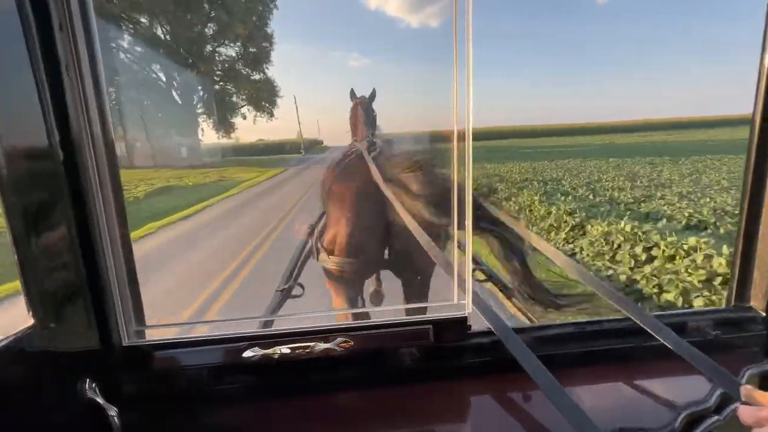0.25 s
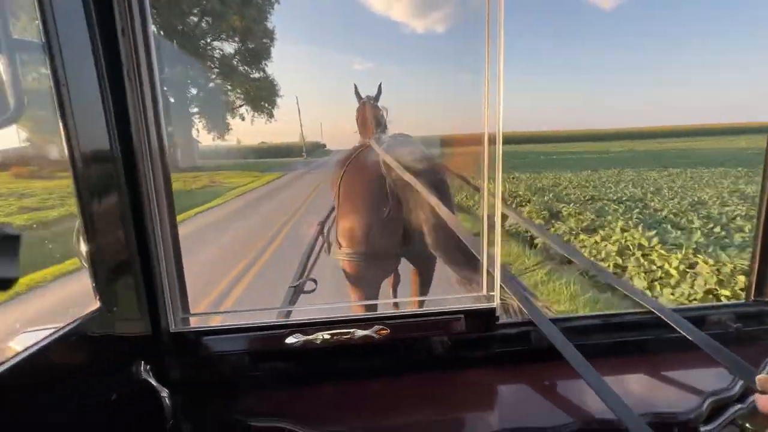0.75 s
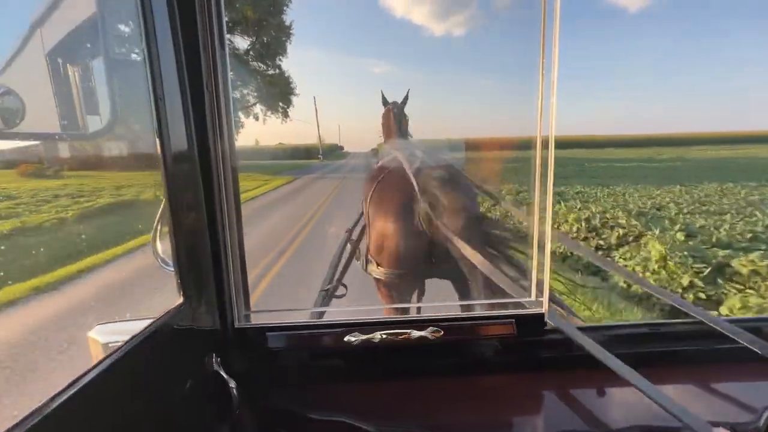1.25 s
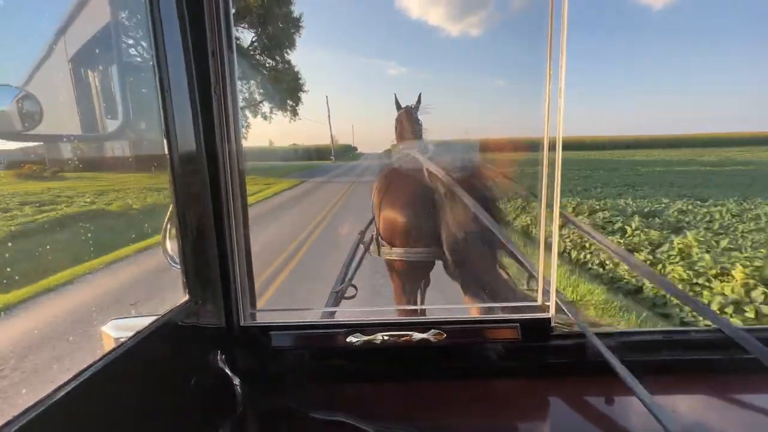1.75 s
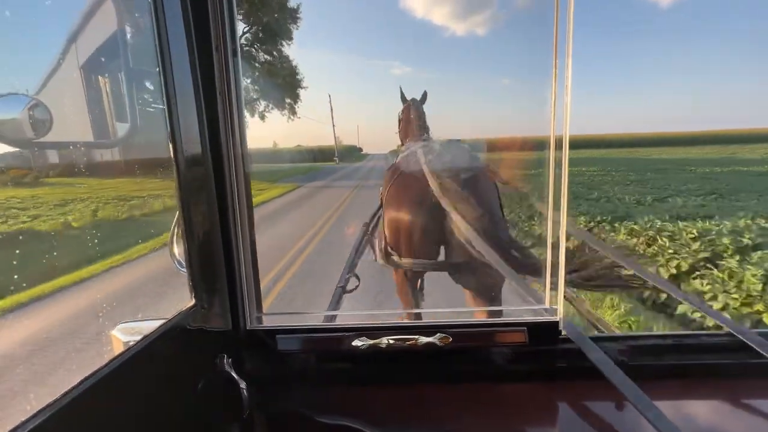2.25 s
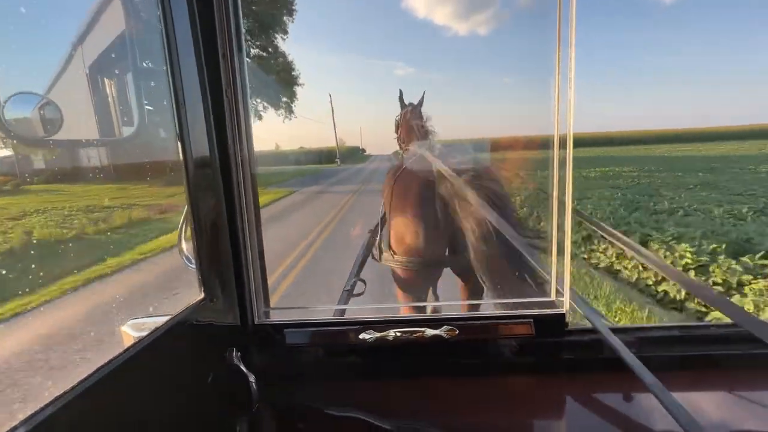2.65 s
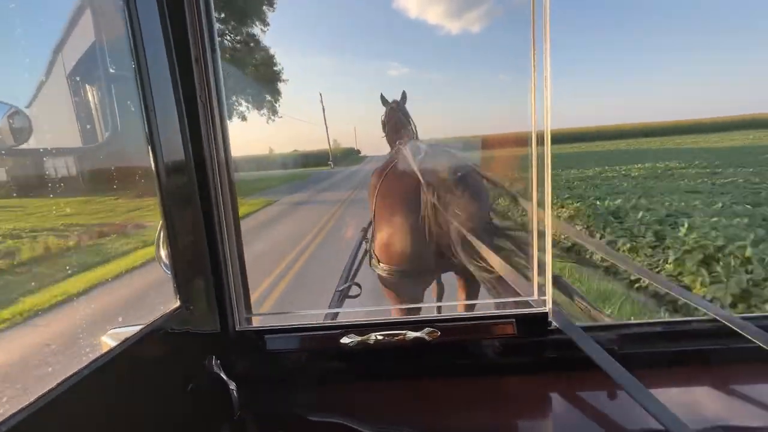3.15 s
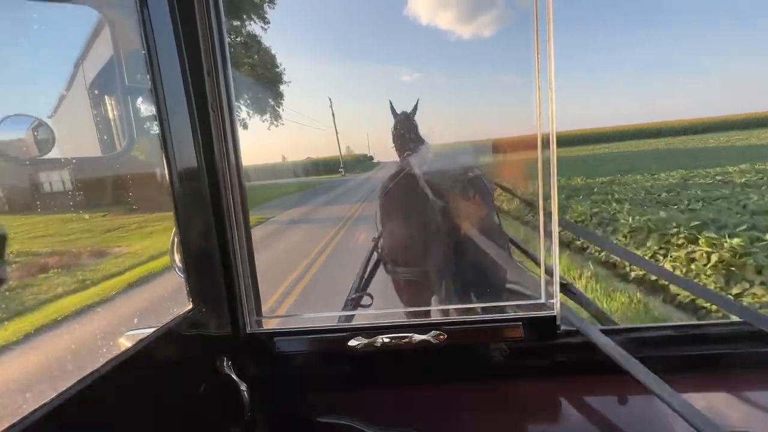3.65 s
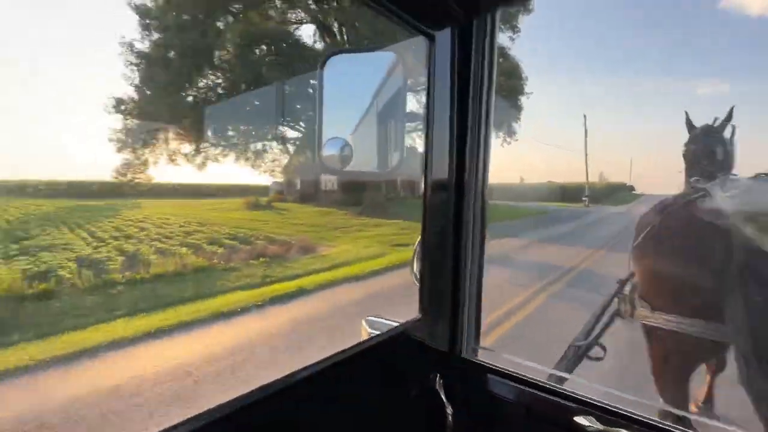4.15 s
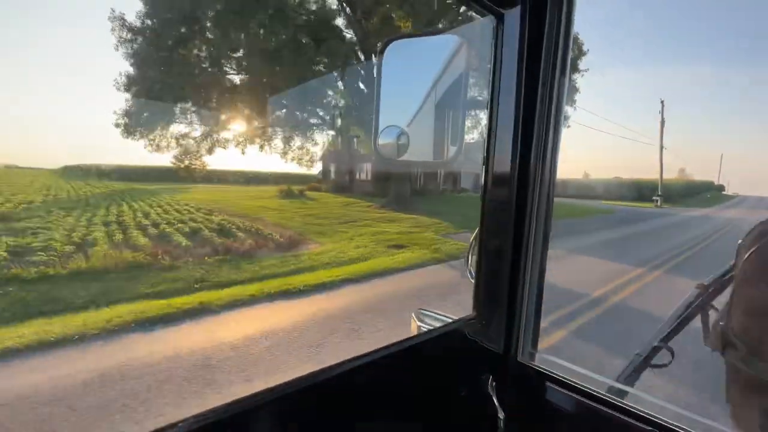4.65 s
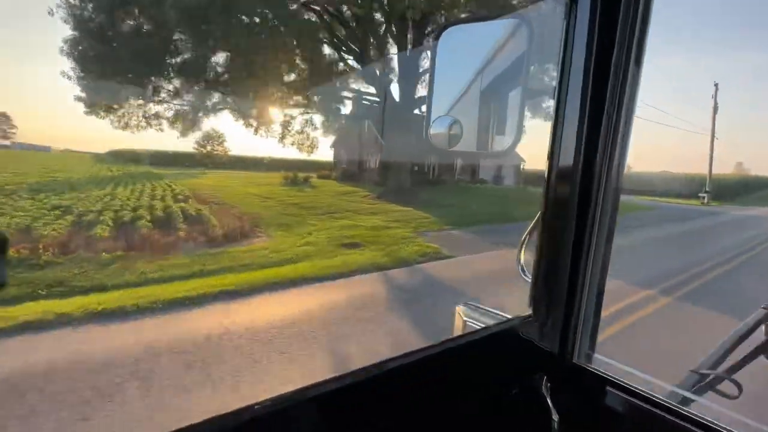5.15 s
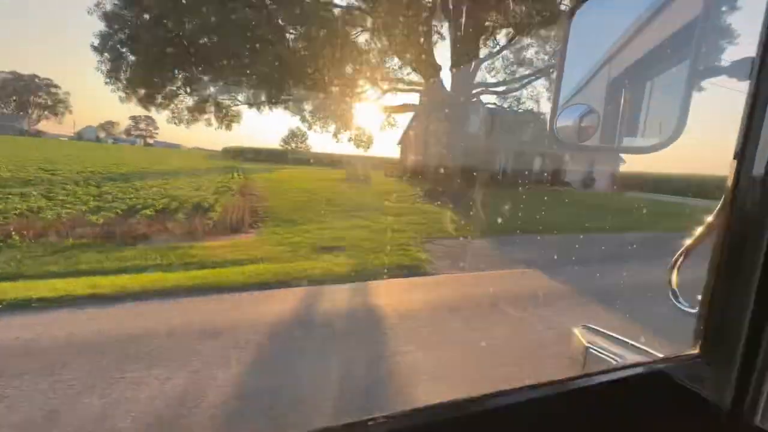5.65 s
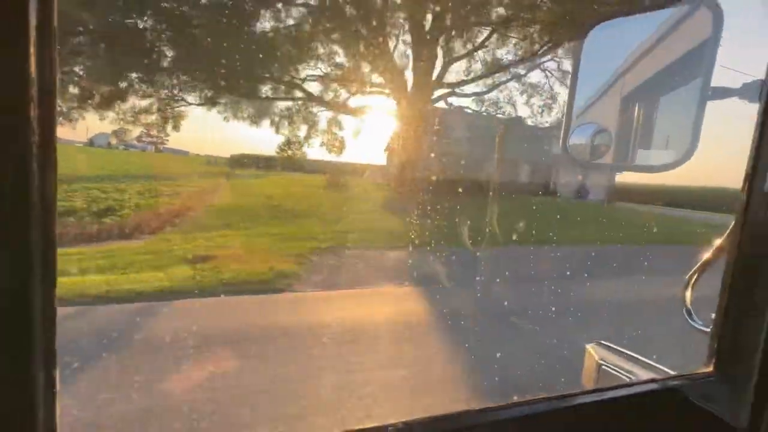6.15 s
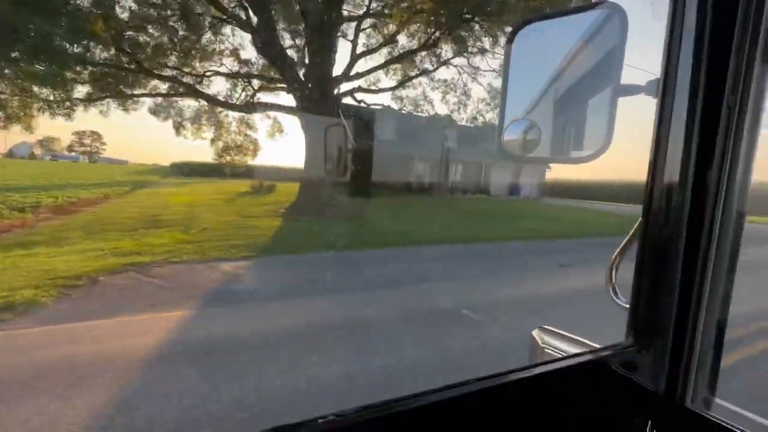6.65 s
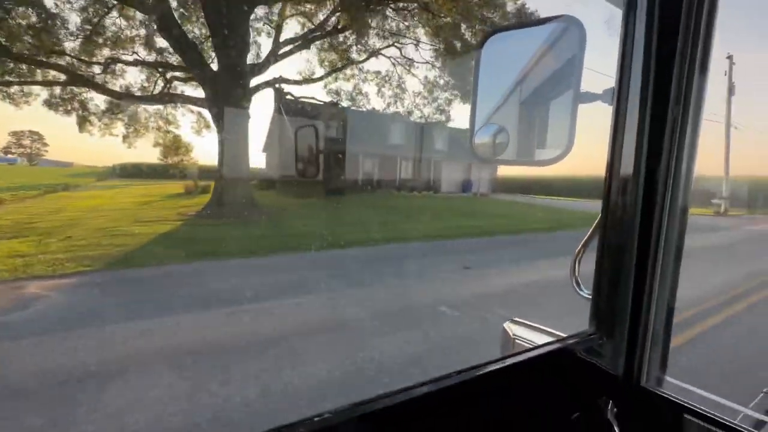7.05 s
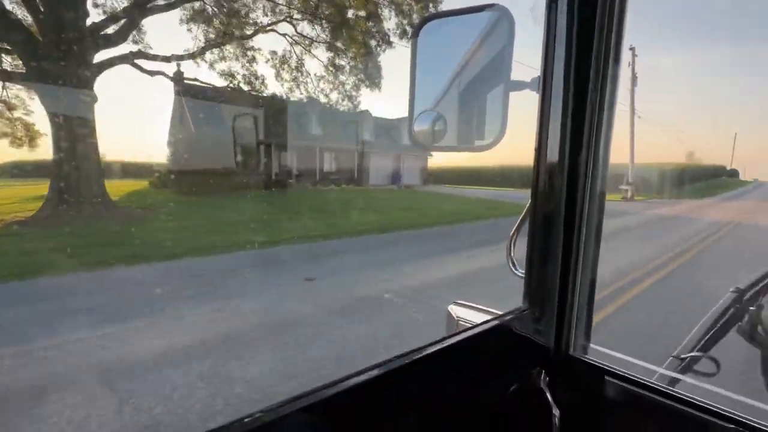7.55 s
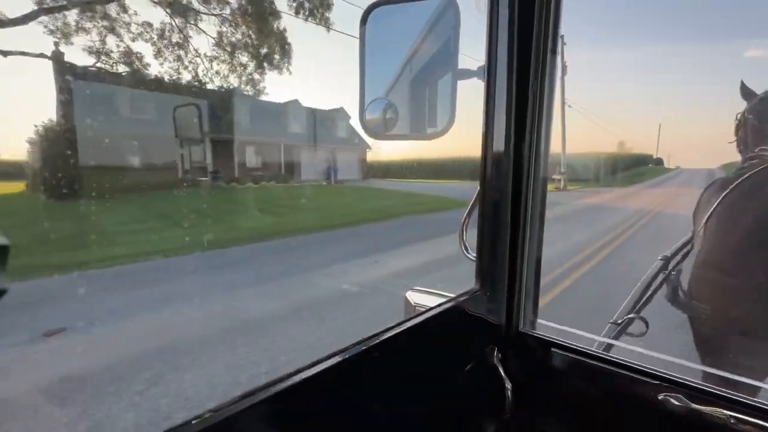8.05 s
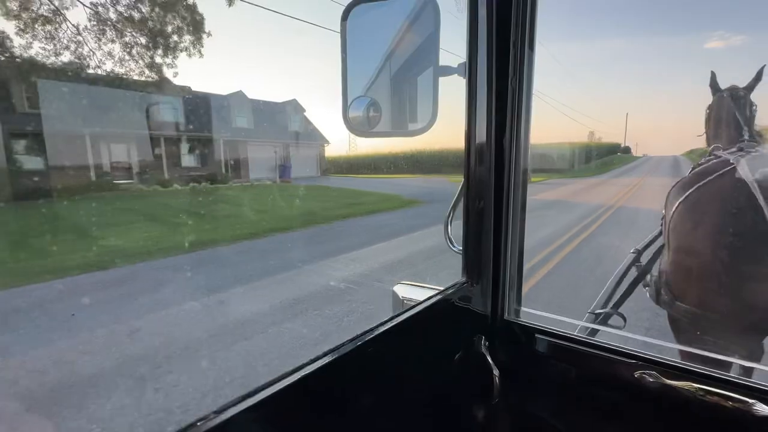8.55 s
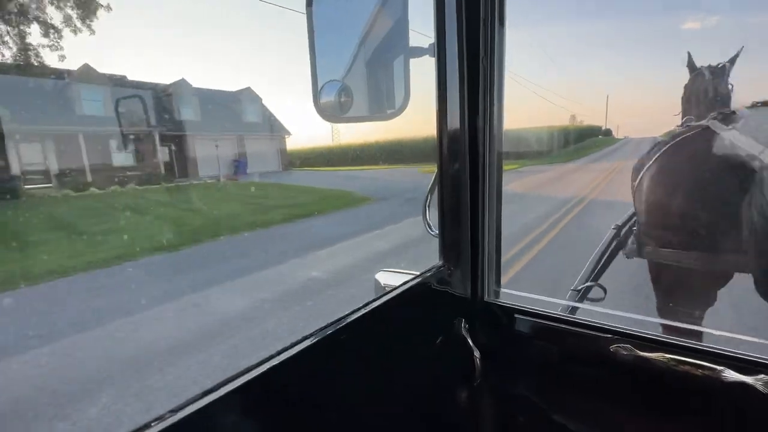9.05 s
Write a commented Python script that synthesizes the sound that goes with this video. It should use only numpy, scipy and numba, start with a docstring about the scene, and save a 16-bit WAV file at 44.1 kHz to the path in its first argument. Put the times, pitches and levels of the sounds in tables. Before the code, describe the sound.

A horse trots steadily on asphalt, hollow paired clops ringing over the low rumble, drumming panels and loose rattles of a closed buggy.

```python
"""Inside the cabin of a closed buggy on asphalt, a phone hears a horse trot ahead.
Hooves land in pairs: a noisy grate of the shoe, then a hollow ring of a few decaying modes.
Wheels shake the cabin: noise through resonances makes panels boom and drum, under two wavering hums.
Loose fittings rattle about thirty times a second as noise clacks with a short metal ring.
Harness chinks and ticks of grit stand out over the banded noise of tyres and road."""
import sys
import numpy as np
from scipy import signal
from scipy.fft import rfft, irfft, next_fast_len
from scipy.io import wavfile
from scipy.ndimage import uniform_filter1d
from numba import njit

SR = 44100
rng = np.random.default_rng(int(sys.argv[2]) if len(sys.argv) > 2 else 0)


def materialize(psi):
    """Save the field psi as 16-bit PCM at rate SR to the path in sys.argv[1].

    A 1-D psi becomes a single channel; in a 2-D psi each row is a channel.
    """
    bounded = np.clip(np.atleast_2d(psi).T, -1, 1)
    quanta = np.round(bounded * 32767).astype(np.int16)
    wavfile.write(sys.argv[1], SR, quanta)


N = 410571

# trot steps, a diagonal pair of hooves each:
# [first hoof t/s, wait for the second t/s, first peak level/dB, second peak level/dB]
STEPS = [(0.217, 0.029, -14, -12), (.534, 0.026, -17, -22.5), (.830, 0.024, -16, -15),
         (1.149, 0.033, -22.5, -20), (1.444, 0.034, -15.5, -14), (1.763, 0.036, -20, -18.5),
         (2.058, 0.032, -18, -13.5), (2.375, 0.033, -21.5, -19.5), (2.676, 0.027, -16, -14),
         (2.983, 0.04, -19, -20), (3.280, 0.032, -14.5, -11), (3.590, 0.049, -19, -22),
         (3.883, 0.036, -18, -13.5), (4.202, 0.04, -16.5, -19.5), (4.498, 0.039, -18.5, -11.5),
         (4.809, 0.038, -19.5, -17.5), (5.107, 0.033, -22, -13), (5.416, 0.041, -21.5, -16.5),
         (5.708, 0.034, -18.5, -10.5), (6.025, 0.036, -21.5, -13.5), (6.324, .030, -18, -13),
         (6.643, 0.027, -22.5, -16), (6.931, 0.028, -17, -10.5), (7.246, 0.031, -21, -18),
         (7.537, 0.027, -18, -12.5), (7.852, 0.028, -20, -17), (8.146, 0.029, -17.5, -10),
         (8.470, 0.026, -22, -18.5), (8.779, .018, -15.5, -12.5), (9.098, 0.026, -22, -23.5)]
SHAKE_HZ = 30.55  # swings of the shaking cabin a second
PORT_LAG = 19  # samples by which the left port hears later
T = np.arange(3300) / SR  # time within a short blow, s


def undb(db):
    """Gain of a dB value."""
    return 10 ** (np.asarray(db) / 20)


def level(x, db):
    """Scale to an rms level."""
    return x * undb(db) / np.sqrt(np.mean(x ** 2))


@njit
def svf(x, hz, width):
    """State-variable band-pass: a damped resonance with gain 1 at the centre."""
    y, band, low = np.empty(len(x)), 0., 0.
    g, damping = np.tan(np.pi * hz / SR), width / hz
    for i in range(len(x)):
        v = (band + g * (x[i] - low)) / (1 + g * (g + damping))
        band, low, y[i] = 2 * v - band, low + 2 * g * v, damping * v
    return y


def noise(hz, width_hz, channels=3):
    """Unrelated streams of noise through two equal resonances, for steep skirts; rms 1."""
    def band(x):
        # two passes narrow the band, so each one is wider
        return svf(x, 1. * hz, 1.84 * width_hz)

    streams = rng.standard_normal((channels, N))
    return level(np.array([band(band(x)) for x in streams]), 0)


def walk(rate):
    """Random levels, rate a second, held and slewed twice; spread near 1."""
    k = int(SR / rate)
    steps = np.repeat(rng.standard_normal(N // k + 1), k)
    return 1.83 * uniform_filter1d(uniform_filter1d(steps, k), k)[:N]


def curve(table):
    """Columns of a table of (s, values) at every sample."""
    s, *columns = np.transpose(table)
    return [np.interp(np.arange(N) / SR, s, c) for c in columns]


def train(s, db):
    """One impulse at each time."""
    return np.bincount(np.clip(s * SR, 0, N - 1).astype(int), undb(db), N)


def tail(blows, t60, rise_s):
    """Envelope of a train of blows: short rise, exponential fall."""
    for pole in (np.exp(-np.log(1000) / (t60 * SR)), np.exp(-1 / (rise_s * SR))):
        blows = signal.lfilter([1], [1, -pole], blows)
    return blows / (rise_s * SR)


def fade(t60, rise_s):
    """Envelope of one blow: short rise, exponential fall."""
    return (1 - np.exp(-T / rise_s)) * np.exp(-np.log(1000) * T / t60)


def ring(modes, scatter_db, detune, rise_s):
    """One blow on a set of modes, each with chance strength, pitch and phase; peak 1."""
    hz, db, t60 = np.transpose(modes)[:, :, None]
    size, tune, turn = rng.standard_normal((3, len(modes), 1))
    phase = 2 * np.pi * hz * (1 + detune * tune) * T + 3 * turn
    x = (undb(db + scatter_db * size) * fade(t60, rise_s) * np.sin(phase)).sum(0)
    return x / np.abs(x).max()


def ports(direct, left, right, like):
    """Direct sound reaches the left port late; each port adds its own cabin reflections."""
    like = np.clip(like, 0, 1)
    late = np.concatenate([np.zeros(PORT_LAG), direct[:-PORT_LAG]])
    shared = np.array([late, direct])
    separate = np.array([left, right])
    return np.sqrt(like) * shared + np.sqrt(1 - like) * separate


def add(out, s, sound):
    """Mix a short stereo sound in at time s."""
    i = max(int(s * SR), 0)
    out[:, i:i + sound.shape[1]] += sound[:, :N - i]


def footfalls():
    """Time and level of every hoof: rows first, second."""
    s, gap, *db = np.transpose(STEPS)
    return np.array([s, s + gap]), np.array(db)


def road(grit_db):
    """Half-octave bands of rolling noise; the upper ones follow the grit, crackle, and rise around each step."""
    # colour of the rolling noise before the whole is levelled: [f/Hz, band level/dB]
    road_colour = [(110, -31), (190, -16.5), (245, -2.5), (391, -5.5), (696, -18), (1110, -11.5),
                   (1780, -33), (6160, -32.5), (7650, -54), (9330, -35.5), (12900, -45), (14100, -62)]
    s = footfalls()[0].ravel()
    # shafts and harness load the wheels just before and after the hooves land
    stride = uniform_filter1d(uniform_filter1d(train(s, 0 * s), 2600), 2600) * 1300
    crackle = np.tanh(walk(110))
    out = 0
    hz_points, db_points = np.transpose(road_colour)
    for hz in 200 * 2 ** np.arange(0, 6.3, .5):
        bands = (svf(svf(rng.standard_normal(N), hz, hz / 2), hz, hz / 2) for _ in range(3))
        share = min(hz / 1200, 1)
        gritty = share * (grit_db - grit_db.mean() + 4.8 * stride + 2.9 * crackle)
        colour_db = np.interp(np.log(hz), np.log(hz_points), db_points)
        db = colour_db + gritty + 4.5 * np.tanh(walk(45))
        out = out + undb(db) * ports(*bands, like=0.36)
    return level(out, -33.5)


def hum(hz, wander, rate):
    """A tone that wavers in pitch by a relative wander, almost alike at both ports; rms 1."""
    def tone():
        cycles = np.cumsum(hz * (1 + wander * walk(rate))) / SR
        return np.sqrt(2) * np.sin(2 * np.pi * cycles)

    return ports(*(tone() for _ in range(3)), like=1.0)


def hums():
    """The body on its springs and the air in the cabin each hum at a wavering pitch and level."""
    # mean level of the cabin air: [t/s, level/dB]
    air_levels = [(0.0, -16), (0.18, -16), (2.64, -25.5), (3.53, -10), (3.73, -34), (3.81, -12.5),
                  (4.02, -22), (5.78, -16.5), (6.17, -24), (6.25, -9), (6.38, -40), (6.45, -9.5),
                  (7.26, -21.5), (7.91, -25.5), (7.98, -11), (8.38, -25.5), (8.48, -12), (9.31, -25.5)]
    air_db, = curve(air_levels)
    spring = undb(-23 + 0.85 * walk(6.5)) * hum(49, wander=0.13, rate=7)
    air = undb(air_db + 1.3 * walk(12)) * hum(83, wander=0.03514, rate=7)
    return spring + air


def cabin(modes, db, like, bumps):
    """Road bumps shake a set of cabin resonances: noise through two equal band-passes a mode."""
    def resonate(x):
        total = 0
        for hz, width, mode_db in modes:
            # two passes narrow the band, so each one is wider
            passed = svf(svf(x, 1. * hz, 1.34 * width), 1. * hz, 1.34 * width)
            total = total + undb(mode_db) * passed / np.sqrt(width)
        return level(total, 0)

    rings = [resonate(x) for x in rng.standard_normal((3, N))]
    return undb(db) * bumps * ports(*rings, like=like)


def wheels():
    """Wheels shake the cabin: it sways and booms, its panels drum and shudder, and hard bumps thud."""
    # resonances of the swaying cabin, its boom and its panels, each:
    # [f/Hz, nominal width/Hz, level/dB before division by the root of the width]
    sway_modes = [(50.7, 15, -2.5), (39.1, 9.4, -13.5)]
    boom_modes = [(83.27, 9.3, -1), (114.24, 16.7, 1), (136.6, 28.4, -4)]
    panel_modes = [(342.7, 39.3, -0.14), (377.1, 32.6, 1), (420.7, 18.9, -1.86)]
    # hard bumps that make the panels shudder: [t/s, length t/s, drive level/dB]
    hard_bumps = [(0.48, 0.056, -25), (0.683, 0.11, -31), (0.866, 0.057, -31), (1.35, 0.11, -37.5),
                  (1.906, 0.085, -25.5), (2.584, 0.028, -22), (3.122, 0.096, -27.5), (3.606, 0.15, -31.5),
                  (4.37, 0.062, -29), (4.448, 0.059, -29.5), (4.579, 0.024, -26.5), (4.711, 0.037, -28),
                  (4.86, 0.016, -25), (5.387, 0.034, -30), (5.565, 0.17, -32), (5.934, 0.045, -24.5),
                  (6.165, 0.055, -30), (6.318, 0.039, -24), (6.699, 0.1, -28), (7.106, 0.08, -26.5),
                  (7.36, 0.078, -28), (8.042, 0.046, -33), (8.258, 0.025, -23.5), (8.42, 0.046, -33.5),
                  (8.994, 0.063, -27.5), (9.235, 0.038, -28)]
    bump_t60_s, bump_rise_s = 0.068, 0.0013
    # the shafts tug once in two steps, so the panels swell
    panel_mean_db, tug_db, tug_phase = -31.5, 1.5, 0.92  # phase: share of the stride at the top
    thud_db = 0  # the floor boards under a hard bump
    throb_db = 3.5  # a shuddering panel knocks once a swing
    t = np.arange(N) / SR

    strides = np.interp(t, footfalls()[0][0], np.arange(len(STEPS)) / 2)
    panel_db = panel_mean_db + tug_db * np.cos(2 * np.pi * (strides - tug_phase))
    # small bumps come at chance moments and set the panels drumming
    small_s, size = rng.random((230, 2)).T
    drumming = .6 + tail(train(small_s * N / SR, 7 * size - 11), 0.1, 0.002)

    s, length, db = np.transpose(hard_bumps)
    # the scale makes a long bump settle at its drive level
    held = np.cumsum(train(s, db) - train(s + length, db)) * np.log(1000) / (bump_t60_s * SR)
    bumps = tail(held, bump_t60_s, bump_rise_s)
    throb = undb(throb_db * np.sin(2 * np.pi * SHAKE_HZ * t + 2 * walk(10)))

    thuds = undb(thud_db) * bumps * ports(*noise(192, width_hz=237), like=0.67)
    sway = cabin(sway_modes, -16.5, 0.98, 0.9)
    boom = cabin(boom_modes, -17.5, 0.98, 1)
    panels = cabin(panel_modes, 0, 0.89, throb * (undb(panel_db) * drumming + bumps))
    # the cabin shakes a little harder as the road goes on: dB per s, even at mid-way
    rising = undb(0.43 * (np.arange(N) - N / 2) / SR)
    return rising * (sway + boom + panels + thuds)


def chirps():
    """Brief chinks of the harness: a short rough whistle of narrow noise with a hiss above it."""
    # when the harness chinks: [t/s, strength level/dB]
    chink_times = [(0.3616, -36), (2.49, -42), (3.1466, -43), (9.2594, -43)]
    # what a chink sounds with: [f/Hz, width/Hz, level/dB]
    chink_bands = [(9600, 120, 5), (12000, 2200, -4)]
    s, db = np.transpose(chink_times)
    shape = tail(train(s, db - 2.5), 0.09, 0.0016)
    return shape * sum(undb(d) * noise(hz, width_hz, channels=2) for hz, width_hz, d in chink_bands)


def grains(grit_db):
    """Crushed grit ticks as short decaying tones, dense around each step, sparse between; low ones are stronger."""
    step_grains, step_spread_s, loose_grains = 60, .03, 1100
    low_hz, high_hz, grain_t60_s = 800, 6500, .016
    grain_db, spread_db = 10.5, 7  # above the grit level, and scatter
    out = np.zeros((2, N))
    scatter_s = step_spread_s * rng.standard_normal((len(STEPS), step_grains))
    scuffs = footfalls()[0].mean(0)[:, None] + scatter_s
    loose = rng.random(loose_grains) * N / SR
    s = np.clip(np.concatenate([scuffs.ravel(), loose]), 0, (N - 1) / SR)
    t = T[:450]
    shape = fade(grain_t60_s, 0.0022)[:len(t)]
    for at, (pitch, size, left, right) in zip(s, rng.random((len(s), 4))):
        hz = low_hz * (high_hz / low_hz) ** pitch
        db = grit_db[int(at * SR)] + grain_db - 5 * pitch - spread_db * np.log(1 - .9 * size)
        # each port hears the tick at its own phase
        tick = np.sin(2 * np.pi * (hz * t + np.array([[left], [right]])))
        add(out, at, undb(db) * shape * tick)
    return out


def rattles(grit_db, bright_db):
    """Loud knocks, and small ones near every swing of the shaking cabin: a clack and a short metal ring."""
    # loud rattles between the jolts: [t/s, strength level/dB]
    loud_knocks = [(0.38, -32.5), (0.925, -23.5), (1.014, -30), (1.222, -27), (1.257, -31.5),
                   (1.316, -29.5), (1.344, -32), (1.38, -29), (1.4158, -28), (1.752, -34), (1.831, -28.5),
                   (1.948, -28), (2.1658, -32), (2.57, -24.5), (2.617, -23.5), (2.839, -29), (2.957, -32),
                   (2.997, -22.5), (3.081, -28), (3.118, -27.5), (3.151, -32), (3.202, -30), (3.295, -21),
                   (3.4128, -26.5), (3.574, -32.5), (3.604, -22), (3.668, -30.5), (3.703, -27),
                   (3.7257, -24), (3.9006, -30), (3.9908, -24), (4.285, -32), (4.373, -33), (4.776, -27.5),
                   (5.054, -28.5), (5.128, -24.5), (5.206, -26.5), (5.431, -25.5), (5.7008, -26.5),
                   (5.944, -29), (6.029, -28), (6.123, -28.5), (6.2726, -28.5), (6.3, -25.5), (6.3689, -26),
                   (6.4267, -25.5), (6.6536, -23.5), (6.693, -29), (6.727, -23.5), (6.7838, -26),
                   (6.824, -28.5), (6.857, -25.5), (6.885, -28.5), (6.911, -30), (6.986, -27),
                   (7.018, -25.5), (7.078, -24.5), (7.145, -28), (7.179, -27), (7.2, -19), (7.232, -21.5),
                   (7.262, -25), (7.3294, -22.5), (7.3852, -19.5), (7.419, -25), (7.469, -24.5),
                   (7.524, -30), (7.684, -27), (7.724, -28.5), (7.79, -24.5), (7.8212, -28), (7.929, -27.5),
                   (8.078, -28.5), (8.146, -25), (8.328, -22), (8.467, -27), (8.606, -31.5), (8.844, -28),
                   (8.869, -31), (8.8945, -27.5), (9.0034, -28), (9.036, -28.5), (9.156, -27.5),
                   (9.191, -30.5)]
    # noise bands in the clack of a knock: [f/Hz, width/Hz, level/dB, t60 t/s]
    clack_bands = [(1375, 1370, -15.5, 0.051), (2340, 2250, -17.5, 0.11), (3330, 3000, -12, 0.096),
                   (5080, 6200, -8.5, 0.036), (6070, 1000, -8.5, 0.051), (12070, 1900, -6, 0.033)]
    # ringing modes of the loose fitting: [f/Hz, level/dB, t60 t/s]
    fitting_modes = [(2330, -8, .03), (3070, -2, .06), (4200, -6, .035), (6000, -8, .03), (9120, -12, .025)]
    small_db, small_spread_db = 7, 2  # small knocks above the grit level, and scatter
    # the second hoof jolts the fitting: dB relative to the clop, s before it
    jolt_db, jolt_lead_s = -15.5, 0.0034
    # dB per octave: a jolt through the shafts is a dull blow, light knocks are softer contacts
    jolt_tilt_db, small_tilt_db = -2.5, -3.0
    loud_tilt = 0.14  # harder knocks are brighter: dB per octave for each dB of strength

    swings = np.arange(0, N / SR, 1 / SHAKE_HZ)
    slip, size = rng.standard_normal((len(swings), 2)).T
    (_, hoof_s), (_, hoof_db) = footfalls()
    jolts = [hoof_s - jolt_lead_s, hoof_db + jolt_db]
    s, db = np.hstack([np.transpose(loud_knocks), jolts])
    # a swing that ends in a loud knock has no small one beside it
    swings = swings + 0.0065 * slip
    free = np.abs(swings[:, None] - s).min(1) > .02
    swings, size = np.clip(swings[free], 0, (N - 1) / SR), size[free]
    s = np.concatenate([s, swings])
    swing_db = grit_db[(swings * SR).astype(int)] + small_db + small_spread_db * size
    db = np.concatenate([db, swing_db])

    loud = len(loud_knocks)
    tilt_db = np.repeat([0, jolt_tilt_db, small_tilt_db], [loud, len(STEPS), len(swings)])
    tilt_db = tilt_db + bright_db[np.clip(s * SR, 0, N - 1).astype(int)]
    tilt_db[:loud] += loud_tilt * (db[:loud] - db[:loud].mean())

    out, rings = 0, np.zeros((3, N))
    # every knock lands elsewhere, so each band and each mode gets its own share
    for hz, width_hz, band_db, t60 in clack_bands:
        share_db = 5 * np.tanh(rng.standard_normal(len(s)))
        blows = train(s, db + band_db + tilt_db * np.log2(hz / 3000) + share_db)
        out = out + tail(blows, t60, 0.0011) * ports(*noise(hz, width_hz), like=0.027)
    out = out * undb(4 * np.tanh(walk(500)))  # a knock chatters in grains
    for hz, mode_db, t60 in fitting_modes:
        width = np.log(1000) / (np.pi * t60)
        for x in rings:
            blows = train(s, db + mode_db + 4 * rng.standard_normal(len(s)))
            # the scale gives the ring of an impulse a peak near 1
            x += svf(blows, 1. * hz, width) * SR / (2 * np.pi * width)
    return out + undb(-11) * ports(*rings, like=.5)


def hooves():
    """Each shoe grates on the asphalt a moment before the hollow hoof clops; the cabin adds a short wash."""
    # what a hoof rings with: [ratio to the clop pitch, level/dB, t60 t/s]
    hoof_modes = [(1.0, 5, 0.053), (.89, -7, 0.078), (1.09, -2.5, 0.04), (0.648, -10, 0.058),
                  (1.4, -8, 0.03), (2.35, -12, 0.032)]
    # grate of the shoe: f/Hz, width/Hz, t60 t/s, lead t/s before the clop, drive level/dB relative to it
    grate = dict(hz=3100, width_hz=1640, t60=0.085, lead_s=0.0075, db=-19.5)
    # clop pitch of the first and second hoof at the start, its rise along the road, and its scatter
    clop_hz, rise_hz_per_s, spread_hz = (877.6, 959), (11.2, 4.2), (16.5, 11)
    first_db = -4.5  # the first hoof of a pair lands softer: less grate, less top mode

    out = np.zeros((2, N))
    s, db = footfalls()
    scatter_hz = spread_hz * rng.standard_normal((len(STEPS), 2))
    pitch = (clop_hz + np.multiply(rise_hz_per_s, s.T) + scatter_hz).T
    s, db = s.ravel(), db.ravel()
    dull_db = np.repeat([first_db, 0], len(STEPS))
    for at, peak_db, hz, dull in zip(s, db, pitch.ravel(), dull_db):
        modes = [(hz * ratio, d + dull * (ratio > 2), t60) for ratio, d, t60 in hoof_modes]
        rings = (ring(modes, scatter_db=3.7, detune=0.017, rise_s=0.0032) for _ in range(3))
        clop = ports(*rings, like=0.5)
        add(out, at - .0015, undb(peak_db) * clop / np.abs(clop.mean(0)).max())
    out = out * undb(3 * np.tanh(walk(300)))  # grit under the shoe roughens the ring

    shoe = tail(train(s - grate["lead_s"], db + grate["db"] + dull_db), grate["t60"], 0.0039)
    shoe = shoe * undb(11.0 * np.tanh(walk(400)))  # grit breaks the grate into grains
    # the cabin carries the clop on as a short hollow wash
    wash = tail(train(s - .004, db - 14.5), 0.14, 0.0045)
    grating = shoe * ports(*noise(grate["hz"], grate["width_hz"]), like=0.043)
    return out + grating + wash * ports(*noise(910, 570), like=0.15)


def scene():
    """Road, cabin, harness, grit, fittings and horse together."""
    # grit level of the road, and brightness of the rattles as the phone turns:
    # [t/s, grit level/dB, brightness/dB per octave]
    grit_and_brightness = [(0, -50.5, -14.5), (.8, -52, -8.5), (1.1, -48, -9), (1.7, -50.5, -15.5),
                           (4.2, -48.5, -6.5), (6.4, -47.5, -4.5), (6.85, -45.5, -3.5), (7.9, -48, -4.5),
                           (8.7, -47, -5), (9.31, -47.5, -4.5)]
    grit_db, bright_db = curve(grit_and_brightness)
    background = road(grit_db) + hums() + wheels()
    details = chirps() + grains(grit_db) + rattles(grit_db, bright_db)
    return background + details + hooves()


def record(dry):
    """The two ports colour the sound unalike; the phone rounds the loudest peaks and cuts both ends."""
    # balance of the two ports: [f/Hz, left minus right level/dB]
    port_balance = [(60, 0.5), (110, -1), (200, 1.5), (370, 3.5), (670, -1.5), (1220, -2.5), (2240, -1.5),
                    (4090, -5.5), (7480, 0.5), (13700, 1.5)]
    top_hz = 14300
    size = next_fast_len(N)
    hz_points, db_points = np.transpose(port_balance)
    bins_hz = np.arange(1, size // 2 + 2) * SR / size
    tilt_db = np.interp(np.log(bins_hz), np.log(hz_points), db_points)
    port_gains = undb(np.array([tilt_db, -tilt_db]) / 2)
    coloured = irfft(rfft(dry, size) * port_gains, size)[:, :N]
    coloured = signal.sosfilt(signal.butter(2, 30, "high", fs=SR, output="sos"), coloured)
    rounded = 1.1 * np.tanh(coloured / 1.05)
    return signal.sosfilt(signal.ellip(10, .2, 80, top_hz, fs=SR, output="sos"), rounded)


dry = scene()
out = record(dry)
materialize(out)
```